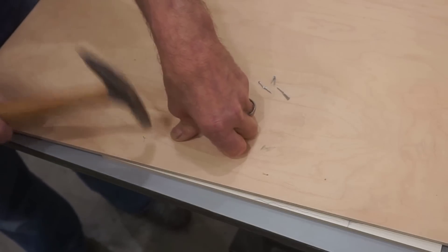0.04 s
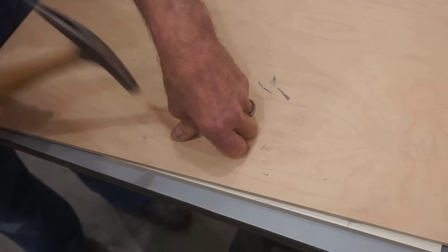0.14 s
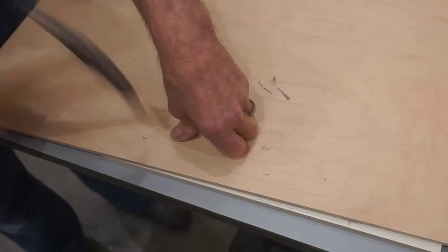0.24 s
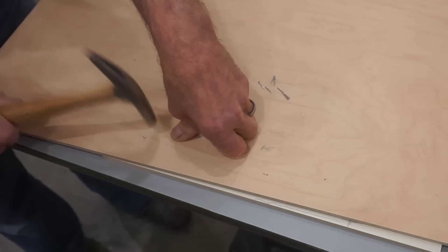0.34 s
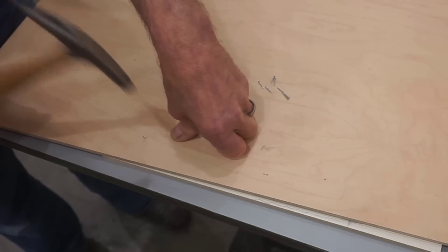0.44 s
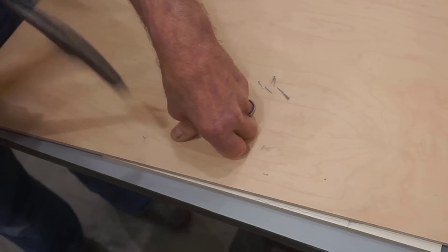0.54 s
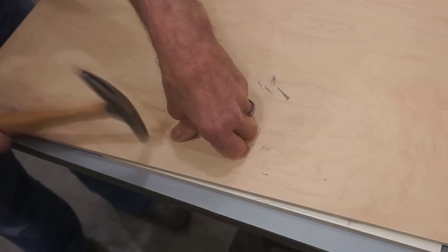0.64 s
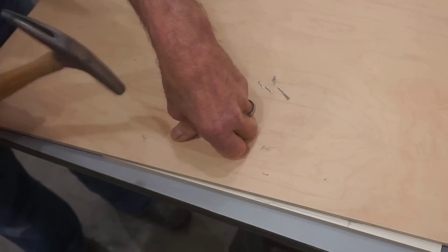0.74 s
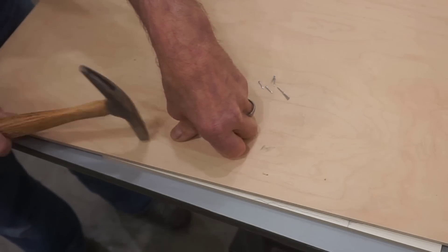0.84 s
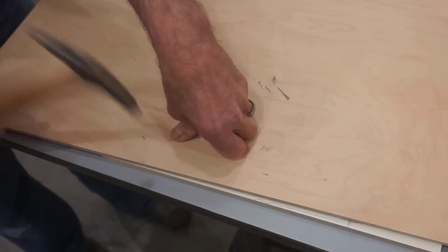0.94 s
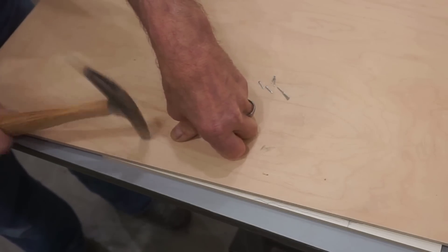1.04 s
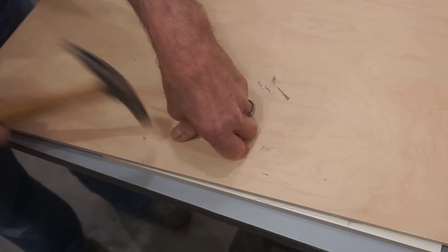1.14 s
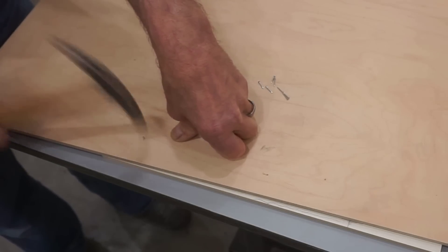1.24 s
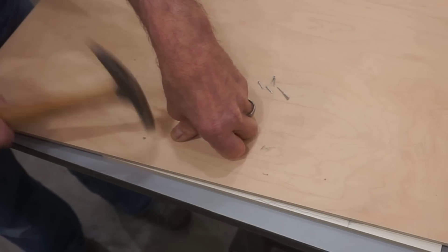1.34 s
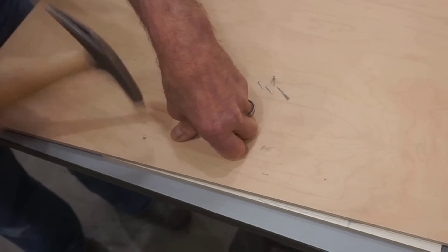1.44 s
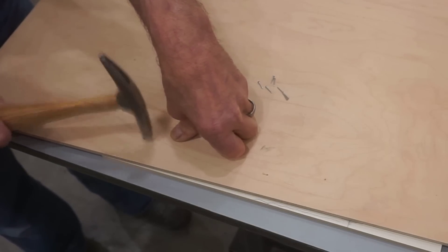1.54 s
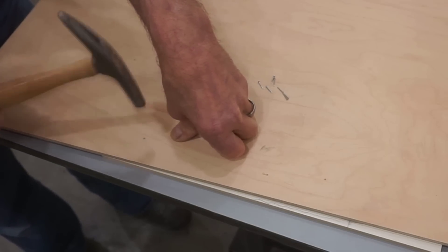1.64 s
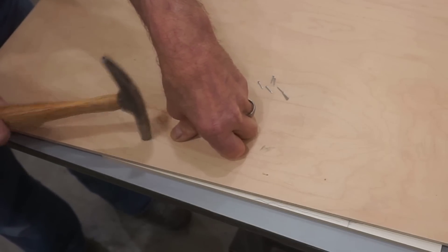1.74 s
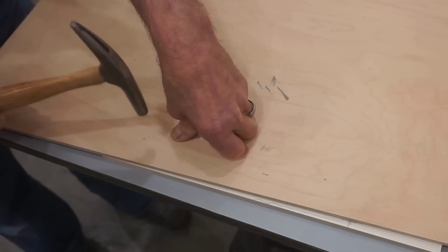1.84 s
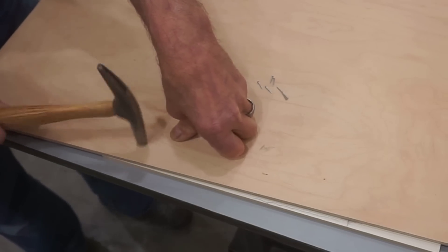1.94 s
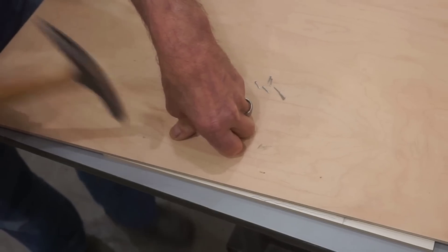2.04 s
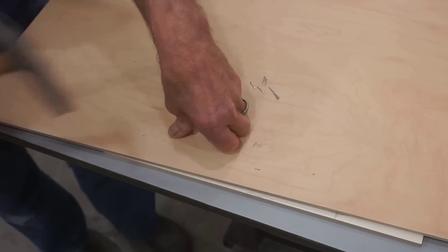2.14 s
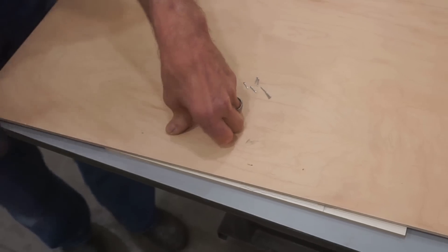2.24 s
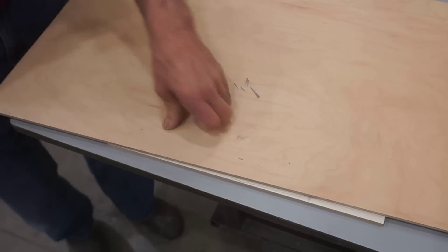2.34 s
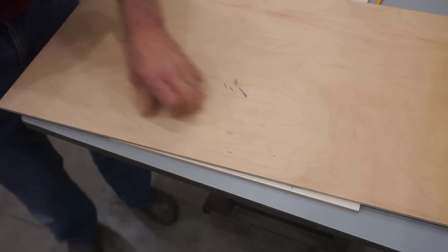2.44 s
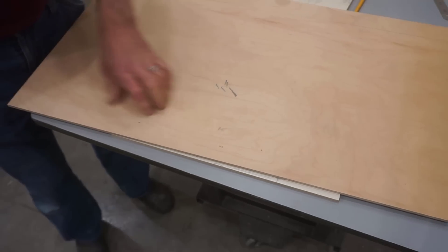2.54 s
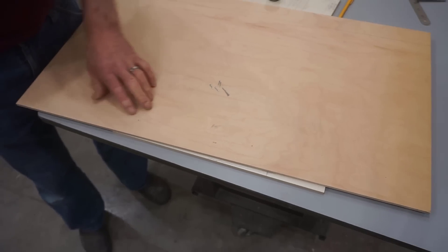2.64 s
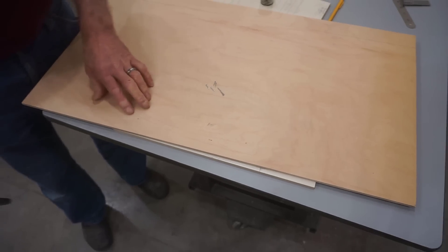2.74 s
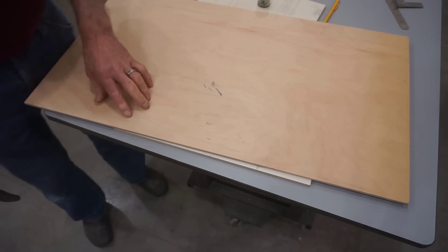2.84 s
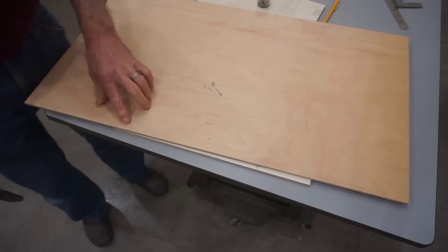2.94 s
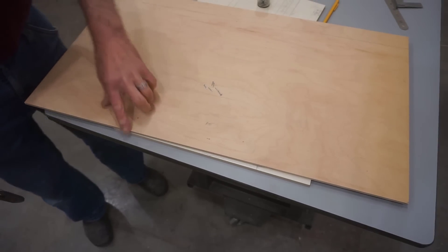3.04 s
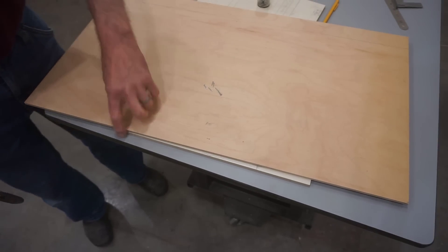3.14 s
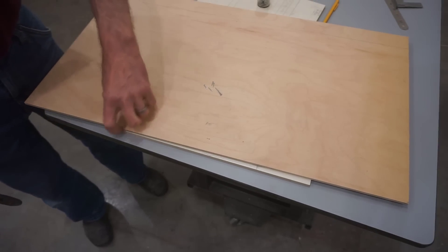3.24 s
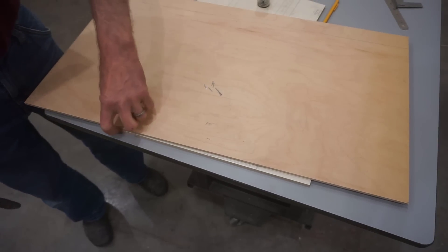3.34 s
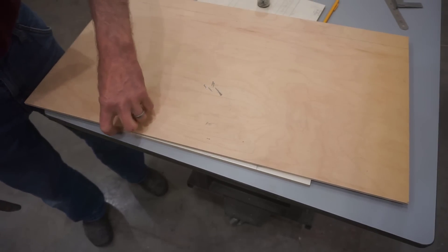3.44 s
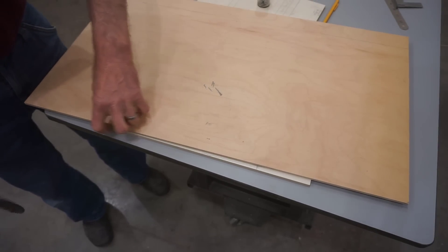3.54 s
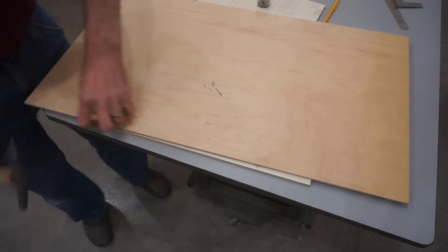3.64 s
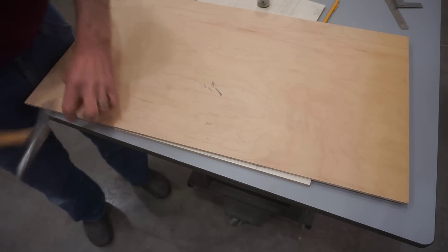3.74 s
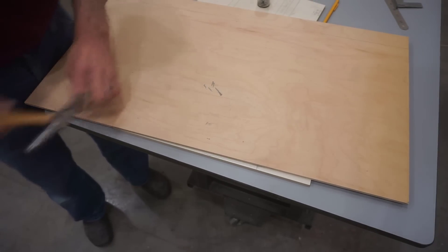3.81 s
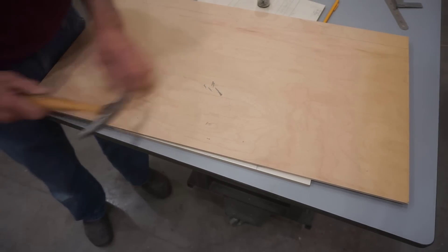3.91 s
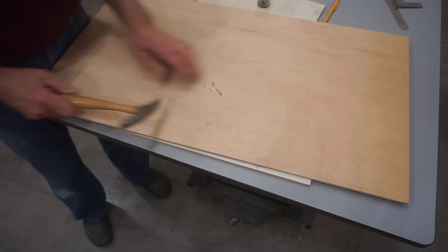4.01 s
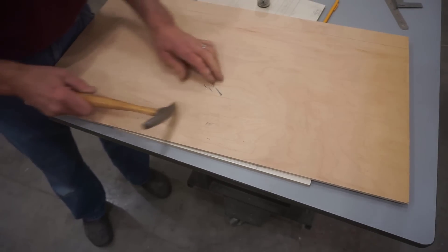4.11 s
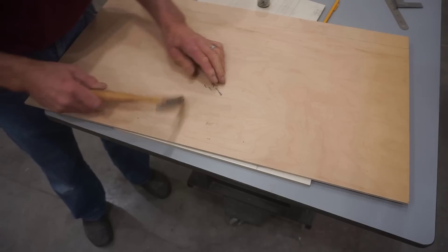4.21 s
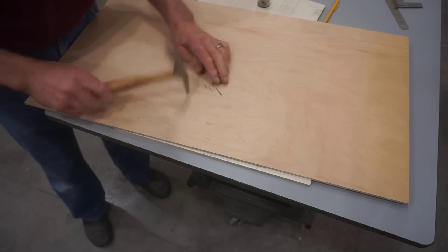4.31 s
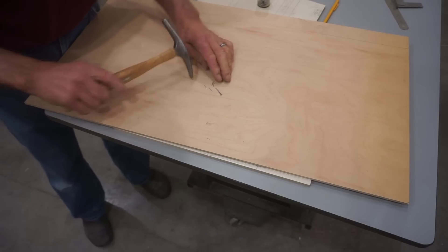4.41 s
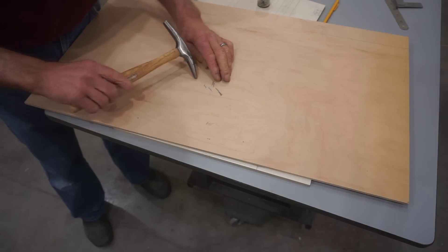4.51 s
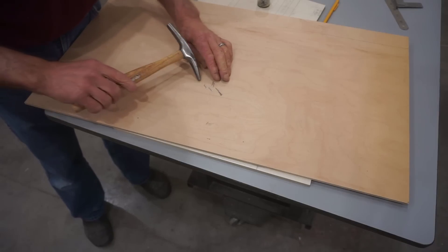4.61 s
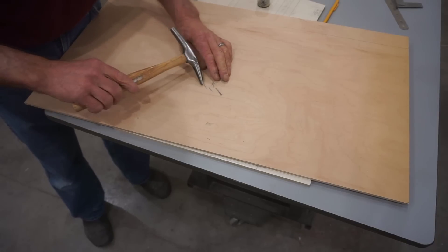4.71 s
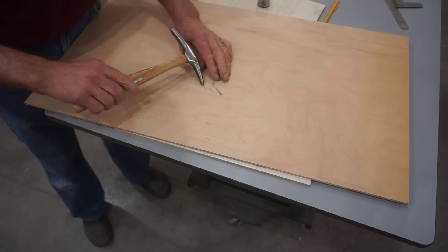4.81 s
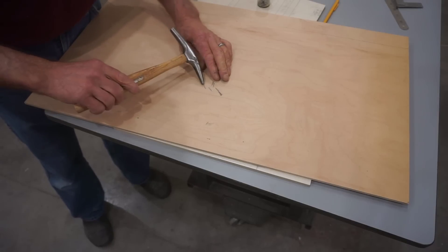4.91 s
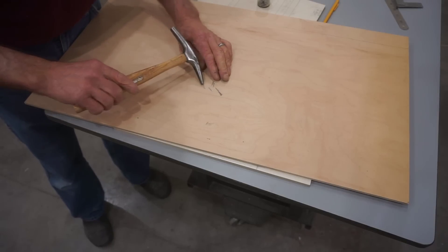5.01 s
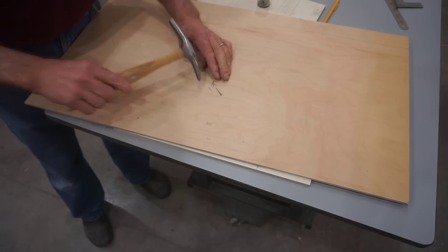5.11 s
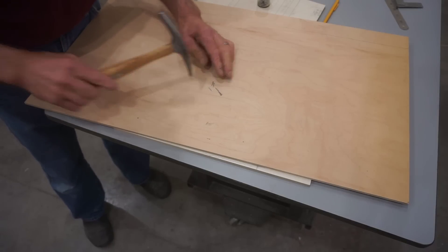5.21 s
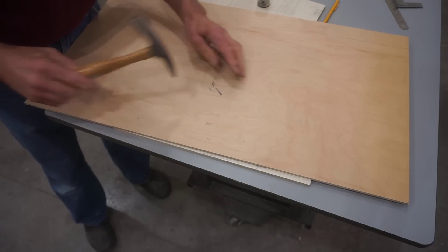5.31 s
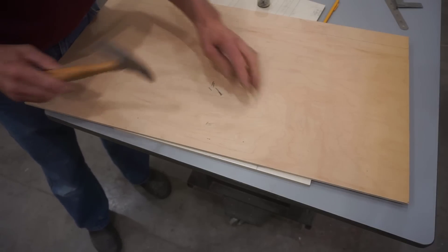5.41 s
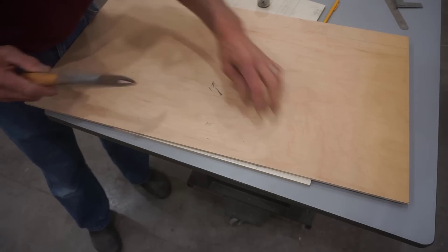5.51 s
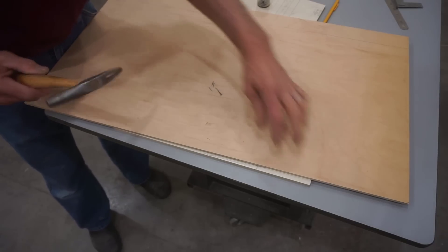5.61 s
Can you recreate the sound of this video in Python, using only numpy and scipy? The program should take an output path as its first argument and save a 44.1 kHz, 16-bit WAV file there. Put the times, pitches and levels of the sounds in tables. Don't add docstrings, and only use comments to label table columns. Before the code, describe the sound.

A small steel hammer raps a plywood sheet loudly nine times, overloading slightly, before quiet skin rustle, brad ticks and two soft taps.

```python
import sys
import numpy as np
from scipy import signal
from scipy.fft import rfft, irfft
from scipy.io import wavfile

SR = 44100
rng = np.random.default_rng(int(sys.argv[2]) if len(sys.argv) > 2 else 0)


def how_loud(loudness_db):
    steps = np.asarray(loudness_db, float) / 20
    return 10 ** steps


def generate_wav(signal):
    frames = np.transpose(np.atleast_2d(signal))
    scaled = np.clip(frames, -1, 1) * 32767
    pcm = np.round(scaled).astype(np.int16)
    wavfile.write(sys.argv[1], SR, pcm)


N = 249606
TOUCH_LEAD_S = 0.044


def hammer():
    return hard_blows() + light_taps() * how_loud([[3], [-9]])


# start_s, board_ring_db, bench_slap_db, steel_crack_db, first_touch_db
BLOWS = [
    (0.0666, -5, -6.5, -3.5, -16.5),
    (0.3671, 6, 3.5, -8, -6),
    (0.6810, -7.5, -7.5, -6, -17),
    (0.9145, -5, -6, -3, -17),
    (1.1361, -3.5, -3.5, 1.5, -12),
    (1.3542, -5.5, -3, 3, -20),
    (1.5762, -5, -2, 0.5, -13),
    (1.7857, 3.5, 3, -0.5, -9.5),
    (1.9893, 1.5, 5.5, -10.5, -18.5),
]
# pitch_hz, level_db, t60_s
EDGE_MODES = [(97.5, -21, 0.24), (216.9, -25, 0.21), (288, -12, 0.02), (498, 2.5, 0.017),
              (636.7, -2.5, 0.092), (702, -2.5, 0.05), (780, 3, 0.0057), (836, 4.5, 0.027)]
# pitch_hz, level_db (per Hz)
BENCH = [(30, -13), (60, 0.5), (110, -1), (250, 0.5), (450, -1.5), (900, -32)]


def hard_blows():
    start_s, touch_db = np.array(BLOWS)[:, 0], np.array(BLOWS)[:, 4]
    pressed_s = start_s - TOUCH_LEAD_S
    thump_db = -19.5 + 0.4 * (touch_db - touch_db.mean())
    thump = ring(soften(clicks(pressed_s, thump_db), 230), hz=121.4, t60=0.03)
    shake = burst(start_s, np.full(len(start_s), -24.5), BENCH, t60=0.69)
    shake = shake * flutter(25, depth_db=2.0)
    graze_spectrum = [(1000, -12), (6000, -8), (10000, 2)]   # pitch_hz, level_db (per Hz)
    graze = burst(pressed_s, np.full(len(start_s), -39.5), graze_spectrum, t60=0.006)
    struck = blow(BLOWS, EDGE_MODES, lag=0.001957, low_hz=73, high_hz=13800)
    direct_only = [[1], [0]]
    return struck + thump + (shake + graze) * direct_only


# start_s, board_ring_db, bench_slap_db, steel_crack_db, first_touch_db
TAPS = [
    (4.253, -26.5, -31.5, -32.5, -55),
    (4.5625, -19, -24.5, -23, -33.5),
]
# pitch_hz, level_db, t60_s
MIDDLE_MODES = [(293, -29, 0.39), (480, -41, 0.077), (520, 10.5, 0.015), (618, 2, 0.077), (780, 1.5, 0.02),
                (876, 7.5, 0.03), (1450, -8, 0.011), (1720, -23, 0.012), (2650, -8.5, 0.015),
                (3240, -13, 0.017)]


def light_taps():
    start_s, ring_db = np.array(TAPS).T[:2]
    body = burst(start_s + 0.0004, ring_db - 8, DRAG, t60=0.24)
    return blow(TAPS, MIDDLE_MODES, lag=0.00083, low_hz=204.5, high_hz=7000) + body


# pitch_hz, level_db (per Hz)
SLAP = [(110, -27.5), (260, -12), (650, -8.5), (1100, 2.5), (1700, -1), (2300, -10.5), (4000, -22)]
# pitch_hz, level_db (per Hz)
STEEL = [(1500, -23.5), (2800, -6.5), (3900, 4), (5200, 5), (6500, 5.5), (7600, -10.5), (10500, -23.5),
         (14000, -21)]


def blow(rows, modes, lag, low_hz, high_hz):
    start_s, ring_db, slap_db, crack_db, touch_db = np.transpose(rows)
    touch_s = start_s - TOUCH_LEAD_S
    first_touch = strike(modes, touch_s, touch_db - 3, spread_db=2.0)
    first_touch = soften(soften(first_touch, 800), 1200)
    sheet = strike(modes, start_s + lag, ring_db, spread_db=2.0) + first_touch

    slap = burst(start_s + lag, slap_db - 2.0, SLAP, t60=0.034)
    crack = burst(start_s, crack_db + 0.5, STEEL, t60=0.019)
    chatter = burst(touch_s, touch_db - 14, SLAP, t60=0.15)
    direct = sheet + slap + crack + chatter

    wide = coloured(clicks(start_s, slap_db), SLAP) + coloured(clicks(start_s, crack_db), STEEL)
    sent = how_loud(-6.5) * sheet + how_loud(14.5) * wide
    band = signal.butter(2, [low_hz, high_hz], "band", fs=SR, output="sos")
    return signal.sosfilt(band, [direct, sent])


def strike(modes, times, db, spread_db):
    luck = rng.normal(0, 1, (len(times), len(modes)))
    total = 0
    for k, (hz, level_db, t60) in enumerate(modes):
        hit_db = np.asarray(db) + level_db + spread_db * luck[:, k]
        total = total + (-1) ** k * ring(clicks(times, hit_db), hz, t60)
    return total


# start_s, peak_db, pitch_hz, t60_s
TICKS = [(2.381, -44, 6500, 0.011), (2.472, -36, 5210, 0.0045), (3.257, -43, 5460, 0.008),
         (3.2874, -33.5, 3000, 0.003), (3.2873, -37, 5300, 0.0035), (3.2941, -31, 5240, .002),
         (3.3026, -38, 4500, .002), (3.3136, -41, 6000, 0.0037), (4.349, -41, 1910, 0.0098),
         (4.381, -34.5, 1600, 0.013), (4.849, -39.5, 6200, 0.013), (4.852, -41, 7450, 0.01),
         (5.1468, -33.5, 5750, 0.0086), (5.153, -36, 3510, 0.074), (0.021, -28, 4600, 0.002),
         (0.053, -30, 7000, .002), (4.85, -42, 3450, .012), (5.148, -44, 3040, 0.019),
         (5.152, -50, 3900, .04), (3.2952, -37, 2000, .003)]
# start_s, peak_db, pitch_hz, t60_s
KNOCKS = [
    (4.126, -44.5, 665, 0.03),
    (4.208, -39, 710, 0.035),
    (4.978, -39, 520, 0.025),
    (5.362, -45, 553, 0.067),
    (5.397, -38.5, 532, 0.066),
    (5.49, -37, 404, 0.02),
    (.022, -17, 250, 0.019),
    (.037, -14, 140, 0.055),
]


def small_touches():
    ticks = sum(ring(clicks([s], [db]), hz, t60) for s, db, hz, t60 in TICKS)
    knocks = sum(ring(clicks([s], [db]), hz, t60) for s, db, hz, t60 in KNOCKS)
    return ticks + soften(knocks, 960)


# start_s, length_s, hiss_db, drag_db
STROKES = [(2.422, 0.23, -57, -50), (2.61, 0.19, -58, -56), (2.857, 0.65, -59, -60),
           (3.484, 0.35, -56, -55), (3.83, 0.28, -65, -77.5), (4.095, 0.36, -60, -56),
           (4.21, 0.45, -63, -52.5), (4.565, 0.34, -53, -43.5), (4.735, 0.085, -54, -52),
           (4.955, 0.056, -64, -58), (5.087, 0.26, -72.5, -84), (5.297, 0.49, -61.5, -60)]
# pitch_hz, level_db (per Hz)
SKIN = [(1180, -54), (2000, -11.5), (2120, -17), (2210, -15), (2370, -14), (3510, -7), (4670, -10.5),
        (6170, -3.5), (7870, -24), (11000, -36), (14300, -75), (22000, -120)]
# pitch_hz, level_db (per Hz)
DRAG = [(300, -5.5), (500, 2.5), (750, 1), (1200, -4), (1700, -10.5), (2400, -47)]


def hand():
    start, length, hiss_db, drag_db = np.array(STROKES).T[:, :, None]
    fastest_at, sharpness = 0.47, 1.13
    done = np.clip((np.arange(N) / SR - start) / length, 0, 1)
    warped = done ** (np.log(0.5) / np.log(fastest_at))
    speed = np.sin(np.pi * warped).clip(0) ** sharpness
    hiss = np.sum(how_loud(hiss_db) * speed, axis=0) * noise(SKIN) * flutter(31, depth_db=1.5)
    drag = np.sum(how_loud(drag_db) * speed, axis=0) * noise(DRAG) * flutter(34, depth_db=1.5)
    return hiss + drag


# pitch_hz, t60_s
SHOP_T60 = [(80, 0.12), (260, 0.59), (700, 0.75), (1800, 0.76), (4800, 0.73), (7000, 0.51), (10000, 0.18)]


def workshop(x):
    t = np.arange(SR * 5 // 4) / SR
    edges = 45 * 2 ** np.arange(0, 8.6, 0.5)
    white = rng.standard_normal((2, 4, len(t)))
    echoes = 0
    for k, (low, high) in enumerate(zip(edges, edges[1:])):
        sos = signal.butter(3, [low, high], "band", fs=SR, output="sos")
        band = signal.sosfilt(sos, white[k % 2])
        echoes = echoes + band * how_loud(-60 * t / at_hz(SHOP_T60, np.sqrt(low * high)))
    echoes = echoes * (1 - np.exp(-(t / 0.012) ** 2))
    echoes = echoes / np.sqrt(np.sum(echoes ** 2, axis=1, keepdims=True))
    hits_s = np.vstack([BLOWS, TAPS])[:, 0]
    turn = np.searchsorted(hits_s - 0.005, np.arange(N) / SR) % len(echoes)
    return sum(signal.fftconvolve(x * (turn == k), echo)[:N] for k, echo in enumerate(echoes))


# pitch_hz, level_db (per Hz)
SHOP_AIR = [(15, -32), (25, 4.5), (124, -1), (169, -17.5), (468, -12.5), (635, -13.5), (2270, -25.5),
            (3680, -23.5), (4750, -28), (5970, -23), (11000, -34), (14300, -66.5), (22000, -120)]


def shop_air():
    fade_in = np.clip(np.arange(N) / SR / 0.004, 0, 1)
    return gain_creep() * fade_in * how_loud(-56.5) * noise(SHOP_AIR)


def buzz():
    start_s, period_s, clock_s = 0.0846, 0.024, 0.00125
    steps = np.floor(np.arange(-3, 232) * period_s / clock_s + 1e-6)
    times = start_s + steps * clock_s
    t = np.arange(-200, 200) / SR
    spike = np.exp(np.minimum(t / 0.001, -t / 0.0014))
    spike_db = -41.5 + rng.normal(0, 0.7, len(times))
    train = np.convolve(clicks(times, spike_db), spike, "same")
    turns = (np.arange(N) / SR - start_s) / period_s
    hum = how_loud(-62) * np.cos(6 * np.pi * turns - 1.2)
    return signal.sosfilt(signal.butter(1, 15, "high", fs=SR, output="sos"), train) + hum


def gain_creep():
    held_db, creep_from_s, creep_db_per_s = -0.5, 3.75, 3.0
    return how_loud(held_db + creep_db_per_s * np.maximum(np.arange(N) / SR - creep_from_s, 0))


def clicks(times, db):
    out = np.full(N, 1e-18)
    out[np.round(np.asarray(times) * SR).astype(int)] = how_loud(np.asarray(db))
    return out


def ring(x, hz, t60):
    r, w = how_loud(-60 / (t60 * SR)), 2 * np.pi * hz / SR
    return signal.lfilter([0, np.sin(w)], [1, -2 * r * np.cos(w), r * r], x)


def soften(x, hz):
    return signal.sosfilt(signal.butter(2, hz, fs=SR, output="sos"), x)


def burst(times, db, spectrum, t60):
    envelope = signal.lfilter([1], [1, -how_loud(-60 / (t60 * SR))], clicks(times, db))
    return envelope * noise(spectrum)


def noise(spectrum):
    return coloured(rng.standard_normal(N), spectrum)


def coloured(x, spectrum):
    gain = how_loud(at_hz(spectrum, np.fft.rfftfreq(N, 1 / SR)))
    return irfft(rfft(x) * gain / np.sqrt(np.mean(gain ** 2)), N)


def at_hz(points, hz):
    table_hz, values = np.array(points).T
    return np.interp(np.log(hz + 1), np.log(table_hz), values)


def flutter(rate_hz, depth_db):
    slow = soften(rng.standard_normal(N), rate_hz)
    return how_loud(depth_db * slow / slow.std())


def scene():
    direct, sent = hammer()
    touches = small_touches()
    echo = how_loud(4) * workshop(sent + how_loud(-22) * touches)
    mid = direct + touches + echo + hand() + shop_air()
    smear = rng.standard_normal(300) / np.sqrt(300)
    side = how_loud(-29.5) * np.convolve(mid, smear, "same")
    return np.array([mid + side, mid - side])


def roll_off(x):
    return signal.sosfilt(signal.butter(12, 12370, fs=SR, output="sos"), x)


def record(dry):
    r = np.exp(-1 / (0.017 * SR))
    power = signal.lfilter([1 - r], [1, -r], dry.mean(axis=0) ** 2)
    x = dry * (1 + power / how_loud(-14.5)) ** -0.3
    ceiling, knee = 0.38, 5.2
    x = x / (1 + np.abs(x / ceiling) ** knee) ** (1 / knee)
    x = signal.sosfilt(signal.butter(2, 75, "high", fs=SR, output="sos"), x)
    x = x + gain_creep() * buzz()
    cutoff_hz = 11100
    x = signal.sosfilt(signal.ellip(8, 0.5, 31, cutoff_hz, fs=SR, output="sos"), x)
    x = signal.sosfilt(signal.cheby2(8, 40, cutoff_hz * 1.19, fs=SR, output="sos"), x)
    return roll_off(x)


dry = scene()
out = record(dry)
generate_wav(out)
```